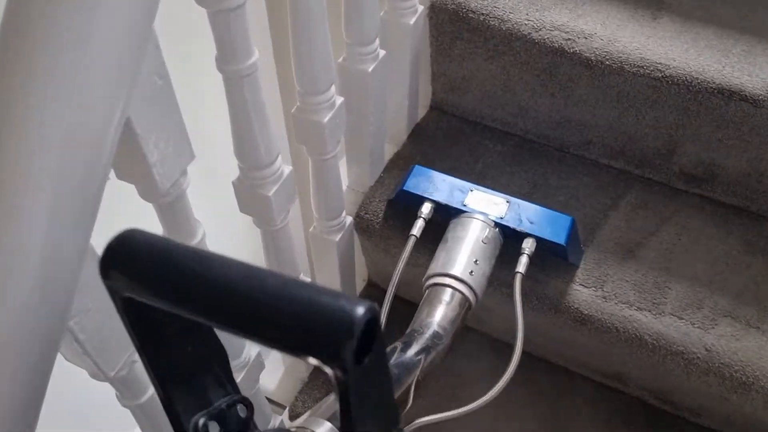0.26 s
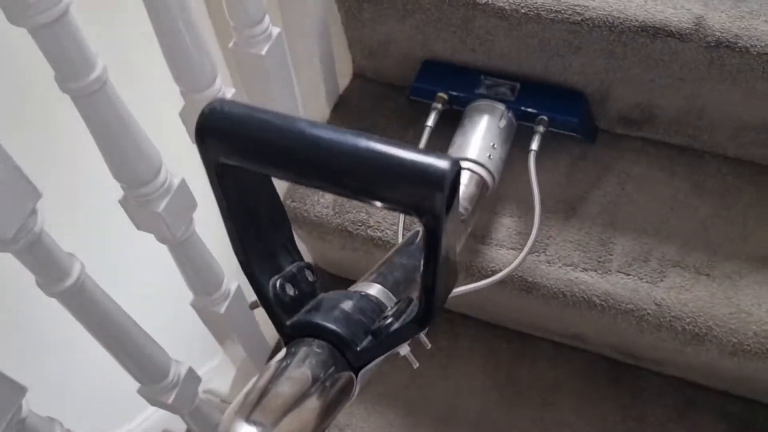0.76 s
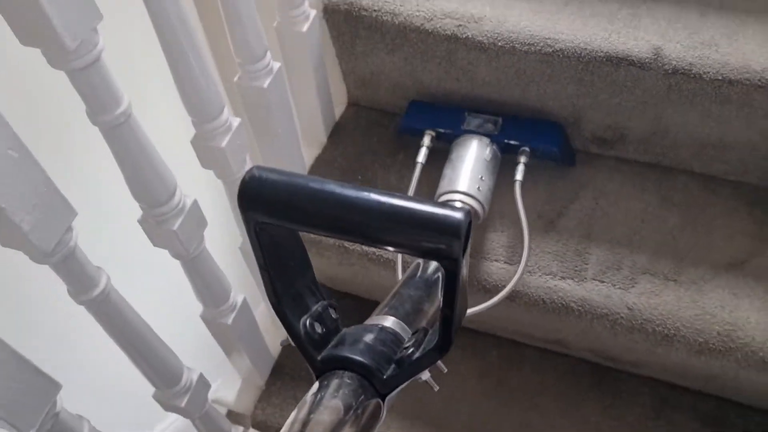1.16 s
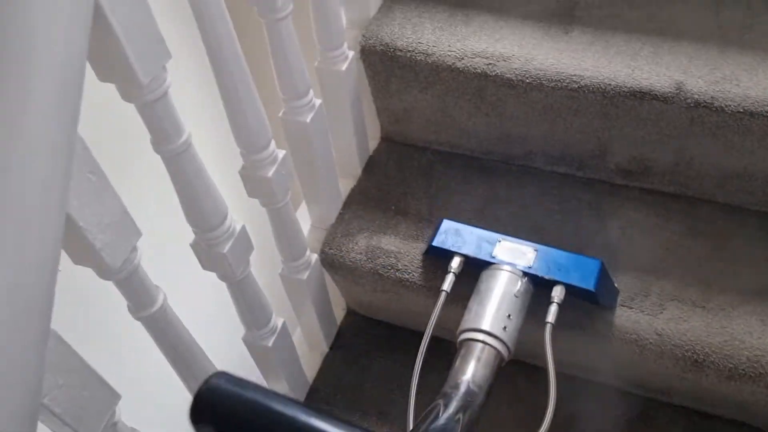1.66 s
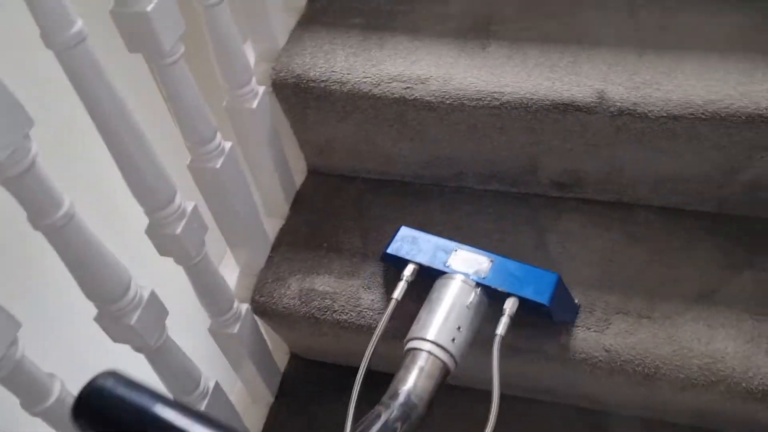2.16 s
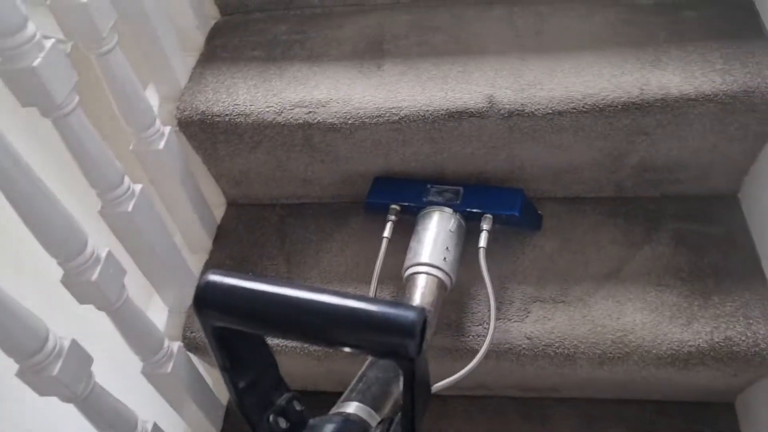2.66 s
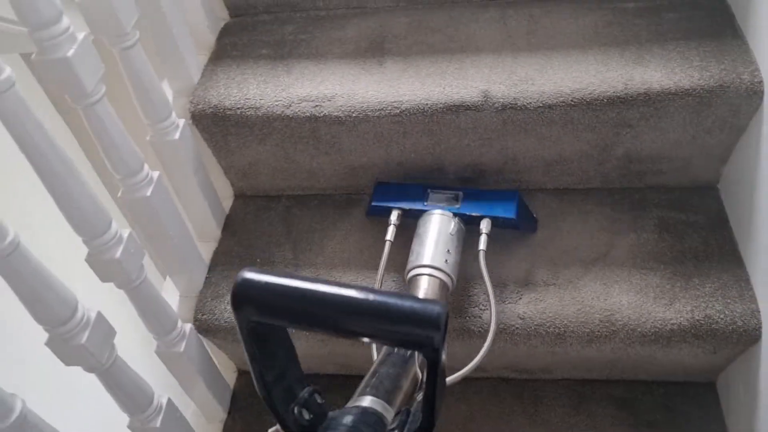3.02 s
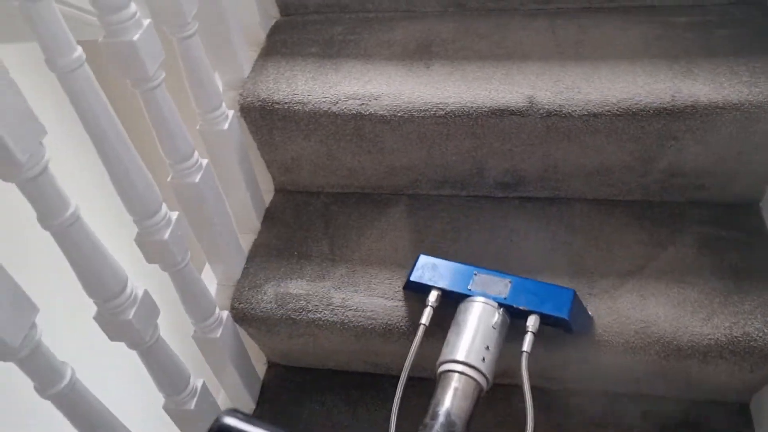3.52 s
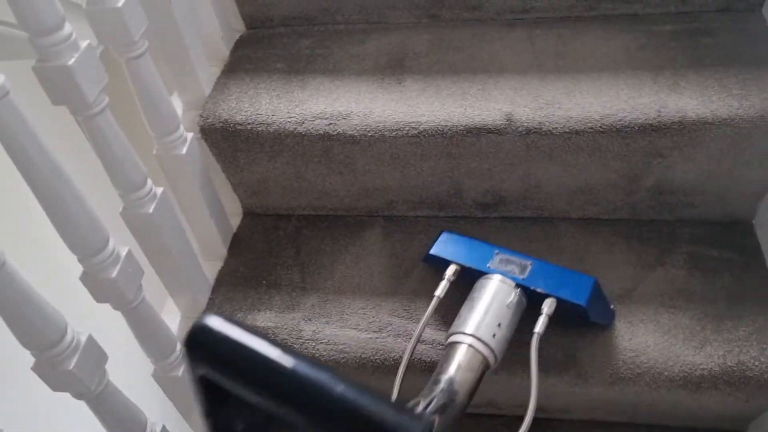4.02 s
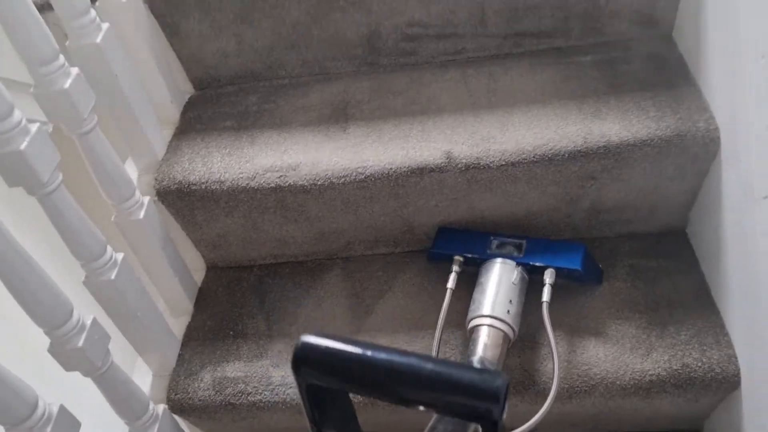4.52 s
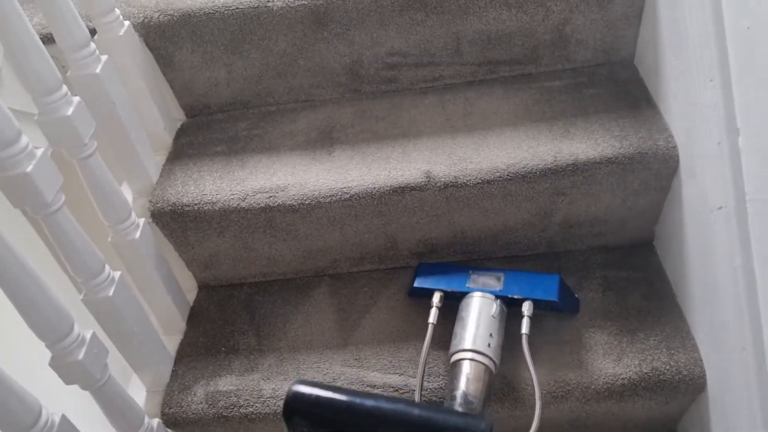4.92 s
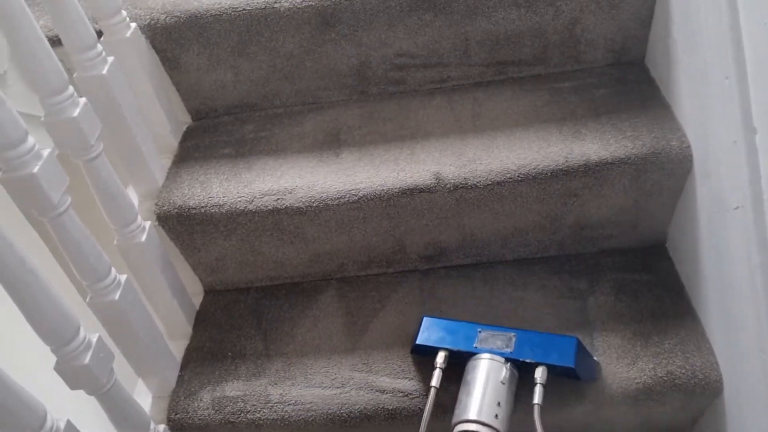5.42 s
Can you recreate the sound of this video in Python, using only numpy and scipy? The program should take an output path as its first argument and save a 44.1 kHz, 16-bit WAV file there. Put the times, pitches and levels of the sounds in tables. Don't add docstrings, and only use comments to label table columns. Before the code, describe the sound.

A carpet-cleaning wand works on carpeted stairs, heard close in stereo. A brief spray stops, leaving airy suction and bumps; a sharp valve clack starts a long bright water hiss. It fades, the head drags and knocks, and another clack starts a second spray, ending in a rushing gulp. After more suction and bumps, a final clack opens the last hiss.

```python
import sys
import numpy as np
from scipy import signal
from scipy.fft import rfft, irfft
from scipy.io import wavfile
from scipy.ndimage import uniform_filter1d

SR = 44100
rng = np.random.default_rng(int(sys.argv[2]) if len(sys.argv) > 2 else 0)


def undo_db(level):
    steps = np.asarray(level, float) / 20
    return 10 ** steps


def unload_audio(sound):
    columns = np.transpose(np.atleast_2d(sound))
    steps = np.round(np.clip(columns, -1, 1) * 32767)
    wavfile.write(sys.argv[1], SR, steps.astype(np.int16))


N = 250488
HOP = 256

# (frequency [Hz], density [dB per Hz])
JET_SPECTRUM = [(410, -47), (700, -18), (851, -6), (1190, -4), (1740, -2.5), (3200, -4), (3550, -1.5),
                (4600, -6), (7340, -4), (8580, -10.5), (11300, -12), (12500, -9), (15600, -7.5)]
# (valve shuts [s], hiss [dB], opening time [s], closing t60 [s])
STROKES = [
    (.084, -31.5, .011, 0.11),
    (1.965, -32.8, 0.0077, 0.54),
    (3.615, -33, 0.0064, 0.42),
    (3.84, -33.5, 0.059, 0.48),
    (5.474, -33, 0.0075, 0.11),
]
JETS_START = (-1, .916, 2.727, 3.64, 4.501)
# (time [s], place [0 at riser, 1 at edge])
PULL = [(0, 0.41), (.09, 0.12), (1.0, -0.055), (1.3, -0.083), (1.57, 0.63), (1.82, 1.32), (2.0, 1.0),
        (2.8, 0.069), (3.07, -0.15), (3.43, 0.49), (3.58, 1.3), (3.66, 0.61), (3.85, .1), (4.6, 0.22),
        (4.8, -0.051), (5.13, 0.42), (5.23, 0.95), (5.47, 0.77)]
# (surge [dB], purge [dB], pull [dB], pull squared [dB]); the jets clear the pile
HISS_CHANGE = (5.5, 0.32, 2, 2.7)
# (at rest [dB], surge [dB], purge [dB], pull [dB], pull squared [dB])
SPLASH_CHANGE = (0.15, 7, -1, -4, -3.5)
FIZZ_CHANGE = (1.0, -3, 4.0, -10, 5.5)
NOZZLE_CHANGE = (4, -3.5, -2, -14, 4.5)
SIDE_CHANGE = (-2, 4, .3, 2, 0)
# (time [s], level [dB])
LEAK_LEVEL = [(.1, -37.5), (.33, -42), (.57, -38), (.67, -41.5), (.735, -44.5), (.785, -47.5), (.9, -45),
              (2.08, -43), (2.26, -41.5), (2.42, -39.5), (2.7, -42.5), (3.96, -41.5), (4.16, -41.5),
              (4.27, -44.5), (4.34, -47), (4.49, -46), (5.5, -37), (5.63, -42)]
# (frequency [Hz], density [dB per Hz])
SLOT_SPECTRUM = [(410, -39), (700, -8), (969, -17), (1050, -7), (1340, -4), (1450, 0.5), (2170, 0),
                 (2340, 0), (3040, 0), (4480, -5.5), (5170, -4.5), (9650, -14), (15600, -12)]
# (frequency [Hz], density [dB per Hz])
PILE_SPECTRUM = [(41, -36), (70, -6), (98, 4), (128, -4), (241, -0.5), (295, -6.5), (317, -14), (383, -3),
                 (464, -11), (561, -6.5), (686, -8.5), (860, -5), (1200, -9.5), (1560, -21), (2640, -120)]
# (strongest [s], rise [s], fall [s], rumble [dB], scuff re rumble [dB])
SHOVES = [(.09, .02, .1, -48, -5), (.475, .03, 0.2, -39, -10), (.63, 0.22, 0.1, -46, 7.5),
          (.75, .05, 0.055, -45, -10), (.92, 0.012, 0.1, -41, 5), (1.5, 0.59, 0.34, -47.5, -12),
          (1.95, .03, 0.038, -32, -2.5), (2.37, 0.13, 0.13, -43.5, -1), (2.49, .03, 0.15, -48.5, -1),
          (2.73, 0.019, .09, -35.5, -3.5), (3.45, 0.53, 0.064, -47.5, -20), (3.61, 0.037, 0.06, -33, -36),
          (3.79, 0.093, 0.06, -33, 8), (4.07, 0.044, 0.3, -47.5, -7.5), (4.28, 0.077, 0.12, -42, -8),
          (4.52, 0.013, 0.053, -35, 3), (5.1, 0.23, 0.33, -52.5, -16), (5.48, 0.019, 0.064, -39.5, -2.5)]
# (frequency [Hz], density [dB per Hz])
DRONE_SPECTRUM = [(11, -43), (18, -18), (48, -6), (65, -10), (81, -9), (90, 2), (120, -45), (200, -120)]
# (frequency [Hz], width [Hz], lift
# [dB])
RESONANCES = [(211.4, 8.8, 1), (302, 12, 8.5), (536, 13, 8), (716, 27, 5.5), (865, 6.1, 5),
              (985, 13, 7.5), (1097, 21, 7), (1360, 170, 2.5), (1545, 55, 2), (1677, 39, 7.5),
              (1890, 9, -4), (2070, 7.9, 7), (2310, 9.6, -11), (2580, 11, 2.5), (3054, 56, 4.5),
              (3455, 145, 4.5), (3740, 220, 2), (4066, 290, 4.5), (5540, 430, -0.5), (7270, 510, -2.5)]
# (frequency [Hz], t60 [s])
BODIES = [
    (53.8, 0.28),
    (98, 0.097),
    (190, 0.081),
]
# (time [s], stair [dB], hose [dB], wand [dB])
KNOCKS = [(0.085, -50, -42, -38), (.712, -19, -41, -36.5), (0.742, -20.5, -28.5, -34),
          (.918, -55, -29, -23.5), (0.949, -46, -47, -28), (1.924, -47, -22.5, -24),
          (2.478, -26.5, -36, -37), (2.533, -44, -29, -52), (2.73, -51, -43, -23.5),
          (3.607, -50, -24.5, -41), (4.253, -34, -31.5, -34), (4.28, -50, -42, -34), (4.314, -50, -28, -46),
          (4.504, -46, -33, -28.5), (5.478, -47, -45, -37)]
# (time [s], thud [dB], scuff [dB], length [s])
DIGS = [(0.086, -23, -33, 0.024), (0.716, -27, -33, .03), (1.924, -22, -17.5, 0.023),
        (2.729, -22, -50, 0.014), (2.478, -21.5, -30.5, 0.022), (2.53, -39, -60, 0.023),
        (3.602, -17, -29, 0.018), (4.203, -48, -29.5, 0.051), (4.254, -16.5, -20, 0.016),
        (4.279, -26, -31, .018), (4.314, -36, -55, 0.031), (4.499, -10.5, -52, 0.011),
        (5.474, -33, -21, 0.0068)]
# (frequency [Hz], density [dB per Hz])
THUD_SPECTRUM = [(100, -32), (200, -8.5), (400, -3), (600, -10), (1000, -14), (2000, -28)]
# (frequency [Hz], density [dB per Hz])
SCUFF_SPECTRUM = [(400, -34), (900, -10), (1300, 3.5), (2000, -3.5), (2600, -9), (3500, -5), (6000, -37)]
# (time [s], peak [dB], left-right [dB], lever [dB], grip [dB])
CLACKS = [
    (0.915, -4.5, 2, -1, 4),
    (2.727, -3.5, 4.5, 0.5, -4),
    (4.5, -2, -0.5, -6, -9),
]
# (frequency [Hz], level [dB], t60 [s])
VALVE_PARTS = [(800, -9, .025), (1300, -12, .02), (2050, -5, .016), (2700, -3, .01), (3600, -4, .009),
               (5100, -1, .006), (6300, 2, .006), (9000, -8, .004), (12500, -3, .004)]
# (frequency [Hz], density [dB per Hz])
ROAR_SPECTRUM = [(35, -42), (60, -3.5), (220, -3.5), (277, -12), (342, 1.5), (478, -45), (531, 0),
                 (628, -32.5), (975, -4), (1250, -4.5), (2350, -3), (2780, -4), (9000, -20.5), (11700, -53),
                 (19800, -120)]
# (frequency [Hz], width [Hz], level [dB])
TUBE = [(980, 30, 5), (1514, 110, 6), (2360, 130, 7), (3980, 130, -12), (4570, 40, -4), (4940, 150, -11)]
# (frequency [Hz], likeness [0-1])
LIKENESS = [(30, .985), (130, .99), (300, .72), (700, .6), (1500, .62), (3000, .48), (7000, .42),
            (15000, .25)]
# (frequency [Hz], left-right [dB])
PORT_COLOUR = [(60, -1.0), (92, -1.0), (140, -2.0), (210, -2.5), (330, -1.0), (500, -0.5), (770, -1.0),
               (1170, -2.0), (1790, -6.0), (2740, -3.5), (4190, -5.0), (6410, -0.5), (9810, -1.5),
               (15000, -1.5)]


def at_hz(points, hz):
    p = np.array(points)
    return np.interp(np.log(np.maximum(hz, 1)), np.log(p[:, 0]), p[:, 1])


def columns(rows, s):
    t, *rest = np.transpose(rows)
    return [np.interp(s, t, c) for c in rest]


def chance(shape, sizes):
    x = rng.standard_normal(shape)
    for axis, size in enumerate(sizes):
        for _ in range(2):
            x = uniform_filter1d(x, size, axis=axis)
    return x / x.std()


def ports(shared, own, shape_db=0):
    left_lag_s, lag_from_hz = 0.0004076, 380
    hz = np.fft.rfftfreq(N, 1 / SR)
    alike = np.clip(at_hz(LIKENESS, hz), 0, 1)
    lag = left_lag_s * hz ** 3 / (hz ** 3 + lag_from_hz ** 3)
    right = rfft(shared)
    left = alike * right + np.sqrt(1 - alike ** 2) * rfft(own)
    left = left * np.exp(-2j * np.pi * hz * lag)
    return irfft(undo_db(shape_db) * np.array([left, right]), N)


def hiss(spectrum, band, shelves, patchy_db, flicker_db, white=None):
    if white is None:
        white = rng.standard_normal((2, N))
    hz = np.fft.rfftfreq(N, 1 / SR)
    shape = at_hz(spectrum, hz)
    inside = (hz > band[0]) & (hz < band[1])
    shape -= 10 * np.log10(np.sum(undo_db(2 * shape[inside])) / len(hz))
    hz, s, z = signal.stft(ports(*white, shape), SR, nperseg=2 * HOP)
    gain_db = patchy_db * chance(z.shape, [1, 3, 45])
    gain_db += flicker_db * chance(z.shape[1:], [30, 4])
    for low, high, rows in shelves:
        part = 1 / (1 + (low / np.maximum(hz, 1)) ** 8) / (1 + (hz / high) ** 8)
        gain_db += np.outer(part, np.interp(s, *rows))
    return signal.istft(z * undo_db(gain_db), SR, nperseg=2 * HOP)[1][:, :N]


def pan(db):
    return undo_db(np.outer([.5, -.5], db))


def ring(x, hz, t60):
    r, w = undo_db(-60 / (t60 * SR)), 2 * np.pi * hz / SR
    return signal.lfilter([0, np.sin(w)], [1, -2 * r * np.cos(w), r * r], x + 1e-18)


def flow(s):
    total = 0
    for start, (shut, db, opening, t60) in zip(JETS_START, STROKES):
        opened = np.clip((s - start) / opening, 0, 1)
        dying = undo_db(db - 60 * np.clip((s - shut) / t60, 0, 2))
        total = total + opened * dying * (s < shut + 2 * t60)
    return total


def spray(s):
    surge_s, settle_s = 0.036, 0.28
    t = s[::HOP // 8]
    since = t - np.max([np.where(t >= at, at, -9) for at, *_ in CLACKS], axis=0)
    pull, = columns(PULL, t)
    surge, purge = np.exp(-since / surge_s), np.exp(-since / settle_s)
    causes = np.array([np.ones_like(t), surge, purge, pull, pull ** 2])
    shelves = [(300, 2500, (t, SPLASH_CHANGE @ causes)),
               (8900, 30000, (t, FIZZ_CHANGE @ causes)),
               (3140, 5200, (t, NOZZLE_CHANGE @ causes))]
    gains = flow(t) * undo_db(HISS_CHANGE @ causes[1:]) * pan(SIDE_CHANGE @ causes)
    gains = [np.interp(s, t, g) for g in gains]
    return gains * hiss(JET_SPECTRUM, (5000, 8000), shelves, patchy_db=2.27, flicker_db=1.0)


def leak(s):
    seal_db, top_db, top_follows = -37, 2, 0.58
    level_db, = columns(LEAK_LEVEL, s)
    top_db = top_db - (1 - top_follows) * (level_db - seal_db)
    shelves = [(4840, 30000, (s, top_db))]
    return undo_db(level_db) * hiss(SLOT_SPECTRUM, (1500, 5000), shelves, patchy_db=1.94, flicker_db=0.57)


def drag(s):
    rest_db, rest_scuff_db = -60.5, -56
    wet_scuff_db = -52
    t = s[::HOP // 4]
    low = undo_db(rest_db)
    scuff = undo_db(rest_scuff_db) + undo_db(wet_scuff_db - STROKES[1][1]) * flow(t)
    for at, rise, fall, db, scuff_db in SHOVES:
        away = np.clip(np.maximum((at - t) / rise, (t - at) / fall), 0, 9)
        shove = undo_db(db - 12 * away)
        low = low + shove
        scuff = scuff + undo_db(scuff_db) * shove
    shelves = [(340, 2700, (t, 20 * np.log10(scuff / low)))]
    rumble = hiss(PILE_SPECTRUM, (70, 330), shelves, patchy_db=2.5, flicker_db=0.9)
    rumble = np.interp(s, t, low) * rumble
    drone = undo_db(-60) * hiss(DRONE_SPECTRUM, (18, 70), [], patchy_db=1.8, flicker_db=2.0)
    pump = undo_db(-62) * np.sin(2 * np.pi * 140.0 * s)
    return rumble + drone + pump


def stairwell(x):
    hz = np.fft.rfftfreq(N, 1 / SR)
    lift_db = sum(db / (1 + (2 * (hz - top) / width) ** 2) for top, width, db in RESONANCES)
    return irfft(rfft(x) * undo_db(lift_db), N)


def bumps(s):
    rows, out, thud, scuff = np.array(KNOCKS), 0, 0, 0
    for k, (hz, t60) in enumerate(BODIES):
        blows = np.zeros(N)
        blows[(rows[:, 0] * SR).astype(int)] = undo_db(rows[:, 1 + k] - 1.5)
        push = np.hanning(int(SR / hz * 0.74))
        struck = ring(signal.fftconvolve(blows, push / push.sum())[:N], hz, t60)
        out = out + 2 * np.e * np.log(1000) / (t60 * SR) * ring(struck, hz, t60)
    for at, thud_db, scuff_db, length in DIGS:
        since = np.clip((s - at) / length, 0, 9)
        shape = np.minimum(since * 25, 1) * np.exp(-since) * (since < 9)
        thud = thud + undo_db(thud_db - 13.0) * shape
        scuff = scuff + undo_db(scuff_db - 5.0) * shape
    out = out + thud * hiss(THUD_SPECTRUM, (100, 1000), [], patchy_db=3, flicker_db=1.5)
    return out + scuff * hiss(SCUFF_SPECTRUM, (600, 4000), [], patchy_db=2.5, flicker_db=3)


def squeeze(s):
    start_s, length_s, level_db = 0.6, 0.15, -38.5
    from_hz, rise_hz_s = 480, 2115
    done = np.clip((s - start_s) / length_s, 0, 1)
    phase = 2 * np.pi * np.cumsum(from_hz + rise_hz_s * length_s * done) / SR
    band = chance((N,), [180]) * np.cos(phase) + chance((N,), [180]) * np.sin(phase)
    return undo_db(level_db) * np.sin(np.pi * done) * ports(band, band)


def valve(s):
    stages = [(0, -22, 0.038, 0.0052), (.0014, -2.5, 0.0045, 0.0065),
              (.0075, -13.5, .002, 0.0056), (.012, -35.5, 0.0073, 0.096)]
    shake = np.zeros((3, 2, N))
    for at, peak_db, side_db, lever_db, grip_db in CLACKS:
        near = slice(int((at - .05) * SR), int((at + .25) * SR))
        part_gains = undo_db([grip_db, lever_db, 0])[:, None, None]
        sides = undo_db([[side_db / 2], [-side_db / 2]])
        for late, db, rise, t60 in stages:
            since = s[near] - at - late
            loss_db = np.minimum(60 * np.maximum(since / t60, -since / rise), 200)
            shake[..., near] += part_gains * undo_db(peak_db + db - loss_db) * sides
    shake *= ports(*rng.standard_normal((2, N)))
    rung = 0
    for k, (hz, db, t60) in enumerate(VALVE_PARTS):
        part = np.searchsorted([1500, 3000], hz)
        rung = rung + (-1) ** k * undo_db(db - 17.0) * ring(shake[part], hz, t60)
    no_bass = signal.butter(4, 640, "high", fs=SR, output="sos")
    return signal.sosfilt(no_bass, rung)


def gulp(s):
    open_s, hold_s, level_db = 3.7, .13, -20
    rise_db_s, fall_db_s = 115.5, 151
    slugs = rng.standard_normal((2, N)) * undo_db(2.4 * chance((N,), [90]))
    flutter_db = 3 - 34 * np.clip(s - open_s, 0, .3)
    roar = hiss(ROAR_SPECTRUM, (1200, 3500), [(20, 940, (s, flutter_db))],
                patchy_db=-1.3, flicker_db=0.0, white=slugs / slugs.std())
    for hz, width, db in TUBE:
        roar = roar + undo_db(db - 3.5) * signal.lfilter(*signal.iirpeak(hz, hz / width, SR), roar)
    before_db = rise_db_s * (open_s - s)
    after_db = fall_db_s * (s - open_s - hold_s)
    loss_db = np.maximum(before_db, after_db).clip(0, 200)
    return undo_db(level_db - 1.5 - loss_db) * roar


def scene():
    s = np.arange(N) / SR
    steady = stairwell(spray(s) + leak(s) + drag(s))
    return steady + bumps(s) + squeeze(s) + valve(s) + gulp(s)


def top_cut(x):
    return signal.sosfilt(signal.butter(12, 16650, fs=SR, output="sos"), x)


def record(dry):
    top_hz, full_scale = 15930, 1.4
    end_s, resume_s = 5.634, 5.676
    hz, s = np.fft.rfftfreq(N, 1 / SR), np.arange(N) / SR
    colour = undo_db(np.outer([.5, -.5], at_hz(PORT_COLOUR, hz)) + 1.0) / (1 + (hz / top_hz) ** 200)
    rounded = full_scale * np.tanh(dry / full_scale)
    x = irfft(rfft(rounded) * colour, N)
    fading = undo_db(-60 - 1200 * (s - end_s)) * (s < end_s + .018)
    resuming = undo_db(-17.5) * np.clip((s - resume_s) / .004, 0, 1)
    mix = x * np.where(s < end_s, 1, fading + resuming)
    return top_cut(mix)


dry = scene()
out = record(dry)
unload_audio(out)
```